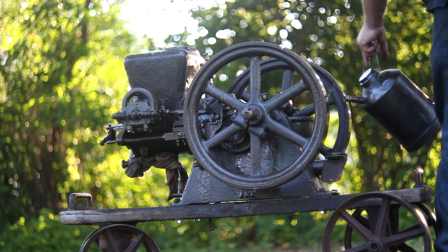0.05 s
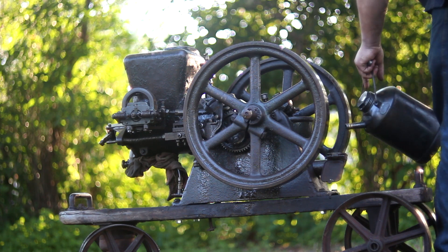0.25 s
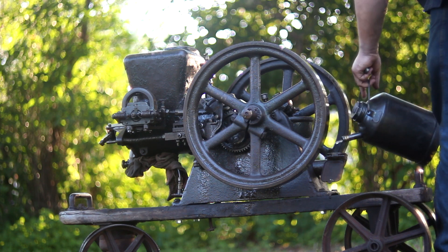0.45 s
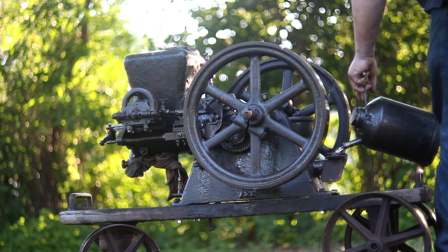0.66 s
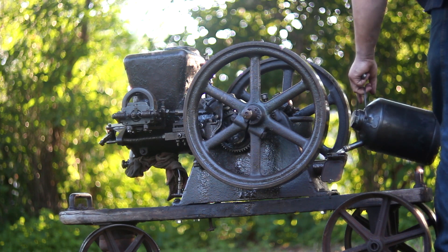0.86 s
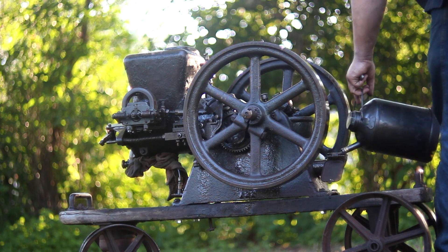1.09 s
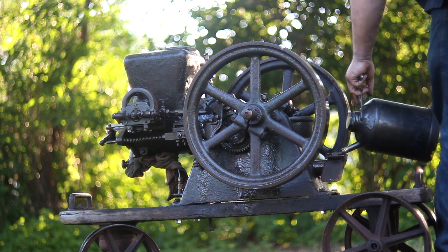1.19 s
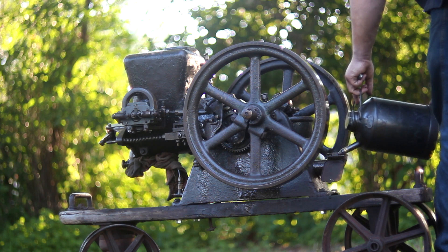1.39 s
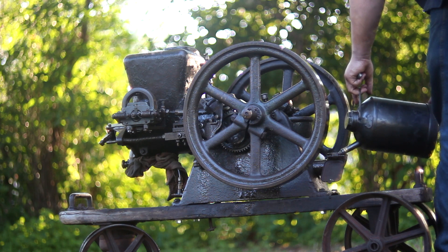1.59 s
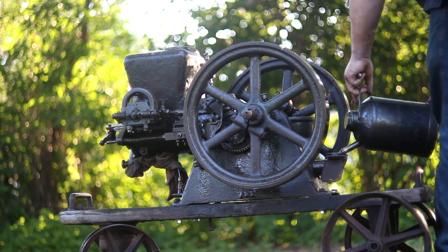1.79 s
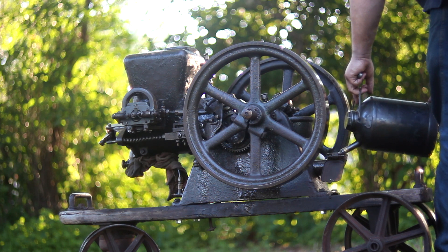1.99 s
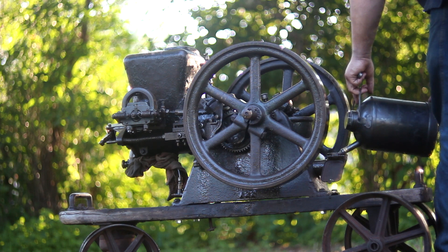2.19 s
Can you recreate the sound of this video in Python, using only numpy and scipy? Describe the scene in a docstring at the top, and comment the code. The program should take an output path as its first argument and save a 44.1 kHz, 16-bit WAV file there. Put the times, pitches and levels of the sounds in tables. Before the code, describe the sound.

Sharp clicks and light clinks of a handled metal oil can over faint outdoor air.

```python
"""At the edge of a wood, a metal oil can is swung up to a stopped old engine.
Its handle and spout click sharply, its body clinks, and rubbing metal gives a few faint squeaks.
Trunks and leaves scatter the clicks and clinks back as a soft swell.
Behind them are low air rumble, leaf hiss, a far motor's hum and a faint insect."""
import sys
import numpy as np
from scipy import signal
from scipy.fft import rfft, irfft
from scipy.io import wavfile
from scipy.ndimage import uniform_filter1d

SR = 44100
rng = np.random.default_rng(int(sys.argv[2]) if len(sys.argv) > 2 else 0)


def unload_audio(sound):
    """Save the sound as a 16-bit wav file, at the path given as the first command line argument."""
    columns = np.transpose(np.atleast_2d(sound))
    # keep every value between -1 and 1, then stretch to whole-number steps
    steps = np.round(np.clip(columns, -1, 1) * 32767)
    wavfile.write(sys.argv[1], SR, steps.astype(np.int16))


N = 99225


def undb(db):
    return 10 ** (np.asarray(db) / 20)


def unit(x):
    return x / np.sqrt(np.mean(x ** 2))


def fade(t, t60_s):
    return np.exp(-np.log(1000) * t / t60_s)


def mode(t, hz, t60_s):
    return fade(t, t60_s) * np.sin(2 * np.pi * hz * t)


def bell(f, hz, octaves):
    return np.exp(-.5 * (np.log2(f / hz) / octaves) ** 2)


def noise(gain):
    """Noise shaped by gain(Hz), rms 1."""
    hz = np.maximum(np.fft.rfftfreq(N, 1 / SR), 1)
    return unit(irfft(rfft(rng.standard_normal(N)) * gain(hz), N))


def band(hz, octaves):
    return noise(lambda f: bell(f, hz, octaves))


def drift(rate_hz):
    """Smooth random drift, rms 1."""
    hold = int(SR / rate_hz)
    steps = np.repeat(rng.standard_normal(N // hold + 1), hold)
    return unit(uniform_filter1d(uniform_filter1d(steps, hold), hold)[:N])


def add(track, start_s, sound):
    i = int(start_s * SR)
    track[i:i + len(sound)] += sound[:N - i]


# Handle and spout contacts. Each row: start in seconds, level in dB, centre in Hz, width in octaves,
# relative snap in dB, send to the trees in dB.
CLICKS = [(0.131, -28, 4400, 0.41, -18, -2), (0.152, -25, 6100, 0.48, -11, -11),
          (0.2051, -11, 4910, 0.58, -19.5, 9.5), (0.404, -32, 4500, 1, -17, -14),
          (0.45, -42, 6000, 0.56, -9, -12), (0.563, -43, 5500, 0.73, -12, -15),
          (0.623, -33, 4600, .5, -16, -12), (0.7487, -17.5, 5680, 0.27, -5, -0.5),
          (0.9281, -19.5, 5100, 0.38, -31, 3), (1.124, -32, 5400, 0.28, -8, 6),
          (1.254, -24.5, 5800, 0.32, -4, -3)]
# Their resonances. Each row: frequency in Hz, relative level in dB, T60 in seconds.
CLICK_MODES = [(2630, 1, 0.0031), (3530, -1, 0.0049), (4135, -1.5, 0.0037), (5230, 0, 0.0035),
               (6300, -1.5, 0.0054), (6910, -3, 0.0067), (7830, 4, 0.0024)]


def clicks(t):
    """Hard contacts ring for a few milliseconds; each favours its own part of the treble."""
    direct, send = np.zeros(N), np.zeros(N)
    t = t[:SR // 20]
    for start_s, db, centre_hz, octaves, snap_db, send_db in CLICKS:
        ring = sum((-1) ** k * undb(mode_db) * bell(hz, centre_hz, octaves) * mode(t, hz, t60_s)
                   for k, (hz, mode_db, t60_s) in enumerate(CLICK_MODES))
        snap = undb(snap_db) * band(hz=10500, octaves=0.39)[:len(t)] * fade(t, t60_s=0.0054)
        click = undb(db) * (ring / np.abs(ring).max() + .5 * snap)
        add(direct, start_s, click)
        add(send, start_s, undb(send_db) * click)
    return direct + trees(send)


# Handle resonances. Each row: frequency in Hz, level in dB, T60 in seconds.
HANDLE_MODES = [(2720, -27.5, 0.005), (3890, -13.5, 0.0094), (5500, -12, 0.011), (6260, -19.5, 0.009),
                (7800, -18, 0.005)]


def handle(t):
    """The hardest click sets the handle ringing a little longer."""
    start_s, rise_s = 0.2053, 0.00019
    age_s = np.maximum(t - start_s, 0)
    ring = sum(undb(db) * mode(age_s, hz, t60_s) for hz, db, t60_s in HANDLE_MODES)
    return ring * (1 - np.exp(-age_s / rise_s))


# Knocks on the can's body. Each row: start in seconds, level in dB, pitch ratio,
# relative scuff in dB, ring length ratio.
CLINKS = [(0.002, -39, 1, 0.5, 0.91), (0.176, -38.5, 1.08, -10, 0.4), (0.298, -38.5, 1.15, 7, 0.17),
          (0.402, -36, 1.02, 5.5, 1.43), (0.441, -42, 1.03, 7, 1), (1.062, -26, 0.96, -14, 0.3),
          (1.0758, -27, 1.0, -22, 0.56), (1.1296, -23.5, 0.99, -19, 0.85), (1.57, -43, 0.84, -4, 0.15),
          (1.692, -39, 0.94, -4, 0.17), (2.16, -39, 0.97, -4, 0.27)]
# Body resonances. Each row: frequency in Hz, relative level in dB, T60 in seconds.
BODY_MODES = [(932, -15.5, 0.12), (1290, -14, 0.14), (1658, -9, 0.38), (1703, 4, 0.026), (1753, 0.5, 0.19),
              (2570, -12, 0.077)]


def clinks(t):
    """Rounded knocks ring the can with a scuff of contact noise; lasting contact cuts the ring short."""
    direct = np.zeros(N)
    t = t[:SR // 2]
    contact_s, send_db = 0.00074, -6
    attack = 1 - np.exp(-(t / contact_s) ** 2)
    for start_s, db, pitch_ratio, scuff_db, length_ratio in CLINKS:
        ring = sum(undb(mode_db) * mode(t, hz * pitch_ratio, t60_s * length_ratio)
                   for hz, mode_db, t60_s in BODY_MODES)
        scuff = undb(scuff_db) * band(hz=2850, octaves=0.88)[:len(t)] * fade(t, t60_s=0.084)
        add(direct, start_s, undb(db) * attack * (ring + scuff) / 2)
    return direct + trees(undb(send_db) * direct)


# Faint squeaks. Each row: start in seconds, length in seconds, centre in Hz, level in dB.
SQUEAKS = [(0.436, 0.0068, 3235, -38.5), (1.367, 0.077, 2670, -55.5), (1.646, 0.047, 3290, -53.5)]


def squeaks():
    """Metal rubbing on metal gives brief, narrow tones."""
    out = np.zeros(N)
    for start_s, length_s, hz, db in SQUEAKS:
        n = int(length_s * SR)
        add(out, start_s, undb(db) * band(hz, octaves=0.025)[:n] * np.hanning(n) ** .5)
    return out


def trees(send):
    """Near echoes off the engine and ground, then a swell from countless trunks and leaves."""
    t = np.arange(SR) / SR
    rise_s, steepness = 0.03, 3.27
    near_db, far_db, return_db = -10.5, -23, -1
    near = undb(near_db) * fade(t, t60_s=0.092)
    swell = 1 - np.exp(-(t / rise_s) ** steepness)
    tail = fade(t, t60_s=0.4) + undb(far_db) * fade(t, t60_s=0.78)
    echoes = (near + swell * tail) * rng.standard_normal(SR)
    return undb(return_db) * signal.fftconvolve(send, echoes / np.linalg.norm(echoes))[:N]


# Spectrum of open air and leaves. Each row: frequency in Hz, relative density in dB.
AIR_SPECTRUM = [(15, -44), (25, -19), (86, -9.5), (113, -2), (183, -4.5), (253, -12), (331, -8), (537, -15),
                (848, -14), (1050, -19.5), (1530, -17.5), (2850, -19.5), (3340, -16.5), (3930, -16.5),
                (5280, -15), (8350, -24.5), (15500, -25.5)]


def air_and_leaves():
    """Low rumble and leaf hiss flicker slightly; only the highest hiss differs between the ears."""
    level_db, flicker_db, side_db = -48, 0.4, -69.5
    hz, db = np.array(AIR_SPECTRUM).T
    air = noise(lambda f: undb(np.interp(np.log(f), np.log(hz), db)))
    side = undb(side_db) * band(hz=12200, octaves=0.4)
    mid = undb(level_db + flicker_db * drift(rate_hz=13.6)) * air
    return mid + side * np.array([[1], [-1]])


# Motor harmonics. Each row: multiple of the shaft rate, level in dB.
MOTOR_HARMONICS = [(2, -64), (3, -57.5), (4, -65), (5, -68), (8, -63.5)]


def far_motor():
    """A far motor hums at multiples of its wavering shaft rate; each drifts in level."""
    shaft_hz, wander_ratio, swell_db = 37.04, 0.01414, 3.5
    rate_hz = shaft_hz * (1 + wander_ratio * drift(rate_hz=8))
    phase = 2 * np.pi * np.cumsum(rate_hz) / SR
    hum = np.zeros(N)
    for multiple, db in MOTOR_HARMONICS:
        gain = undb(db + swell_db * drift(rate_hz=9.13))
        hum += gain * np.sin(multiple * phase + rng.uniform(0, 2 * np.pi))
    return hum


def insect(t):
    """A far insect's thin trill swells and fades."""
    peak_db, peak_s, spread_s = -60, 1.73, 0.17
    swell = np.exp(-.5 * ((t - peak_s) / spread_s) ** 2)
    return undb(peak_db) * swell * band(hz=5290, octaves=0.013)


def scene():
    """The oil can, centred in the outdoor background."""
    t = np.arange(N) / SR
    oil_can = clicks(t) + handle(t) + clinks(t) + squeaks()
    return oil_can + insect(t) + far_motor() + air_and_leaves()


def record(dry):
    """A steep low-pass cuts the highest treble."""
    cutoff_hz = 16000
    return signal.sosfilt(signal.ellip(10, .1, 70, cutoff_hz, fs=SR, output="sos"), dry)


dry = scene()
out = record(dry)
unload_audio(out)
```